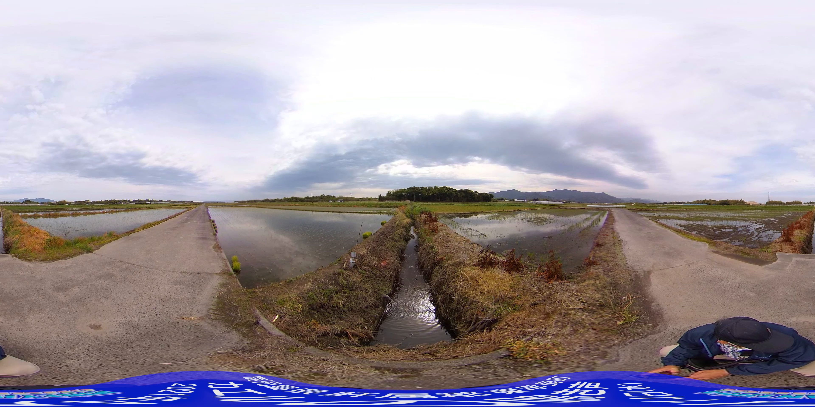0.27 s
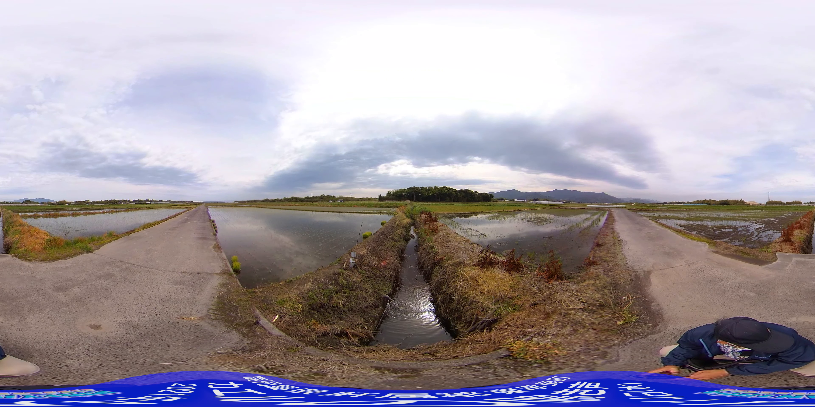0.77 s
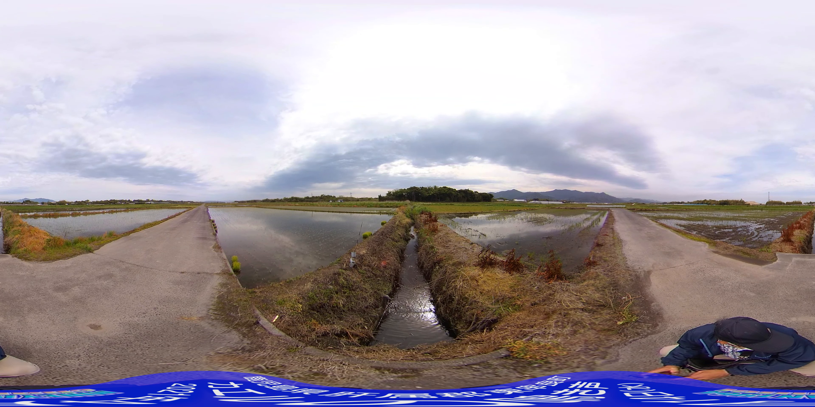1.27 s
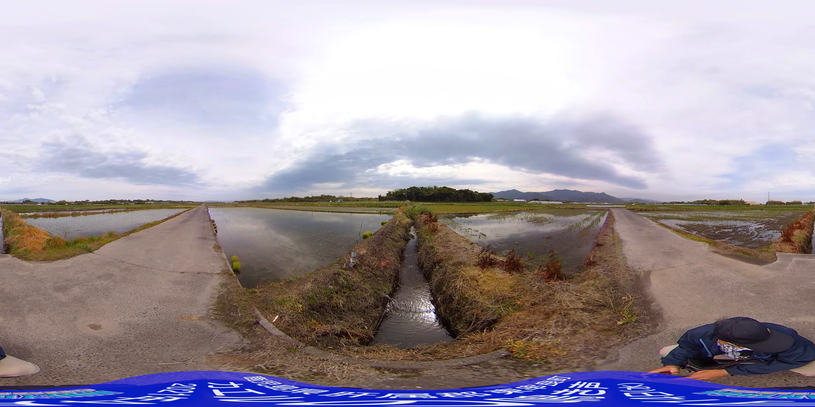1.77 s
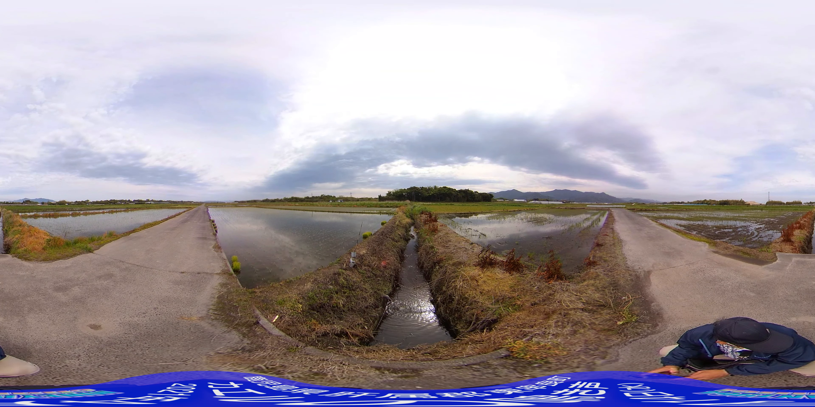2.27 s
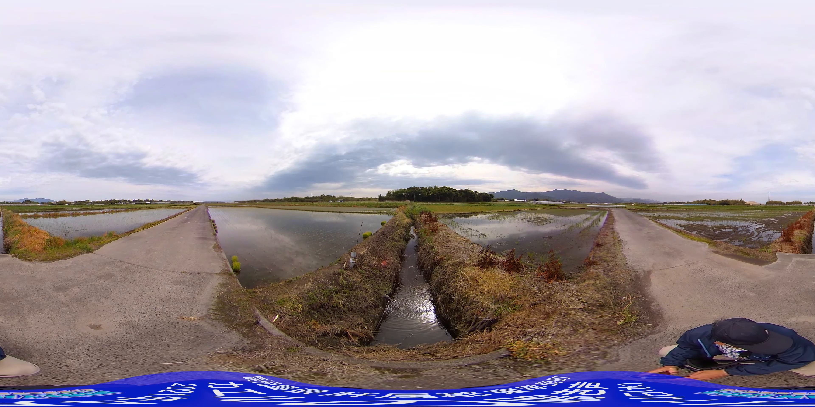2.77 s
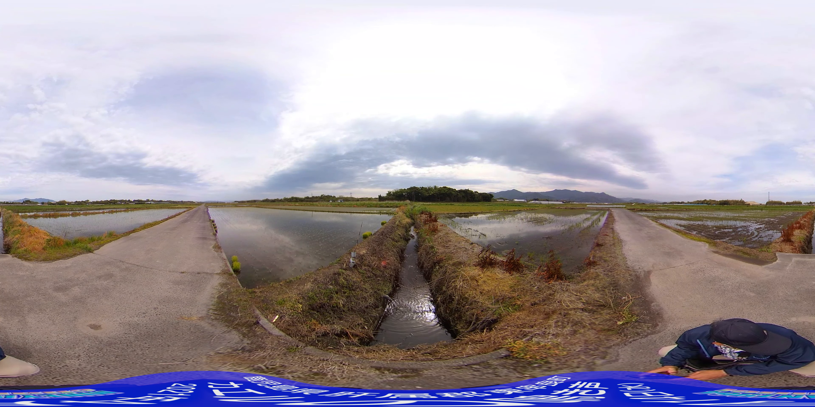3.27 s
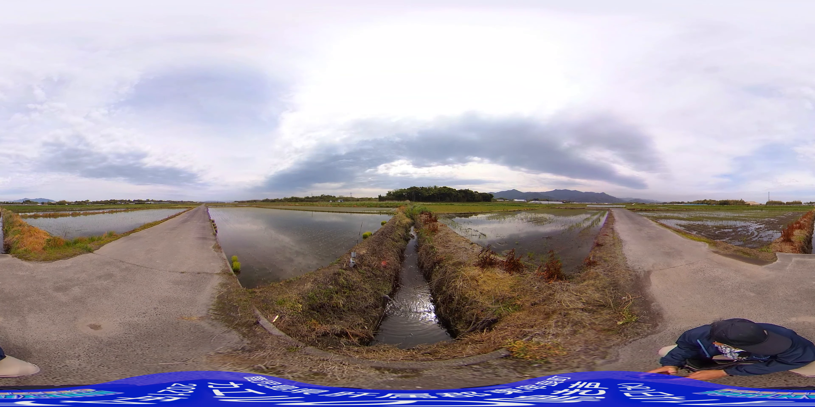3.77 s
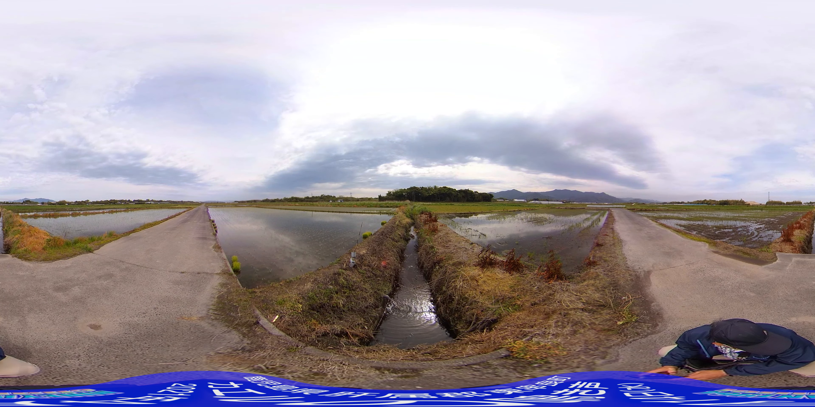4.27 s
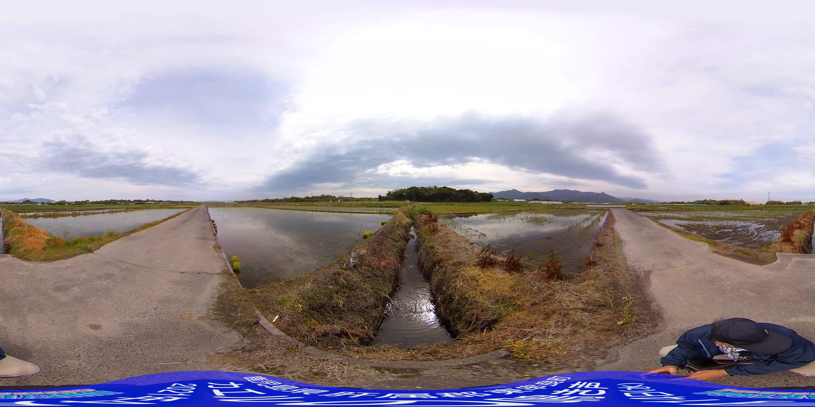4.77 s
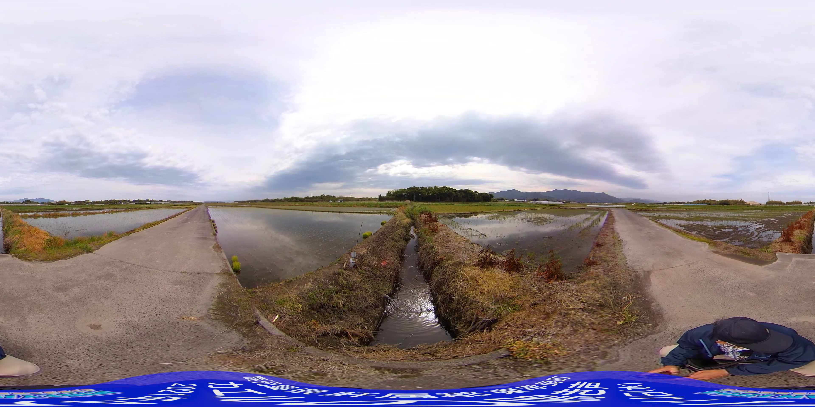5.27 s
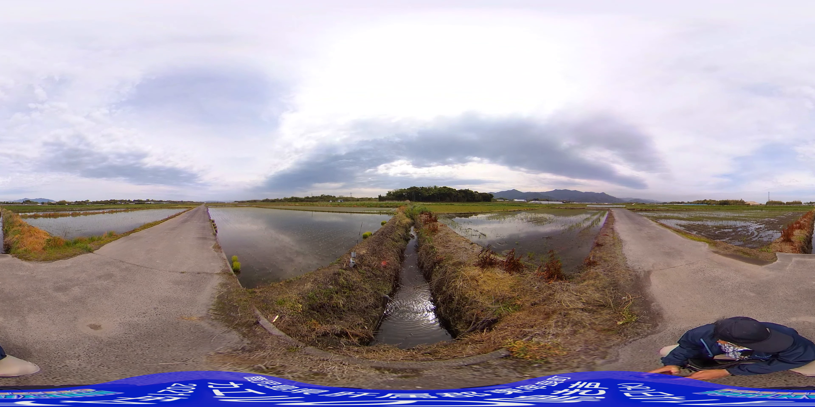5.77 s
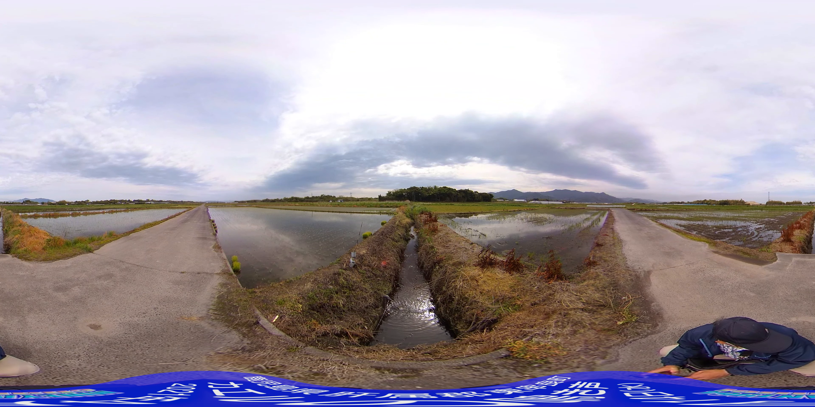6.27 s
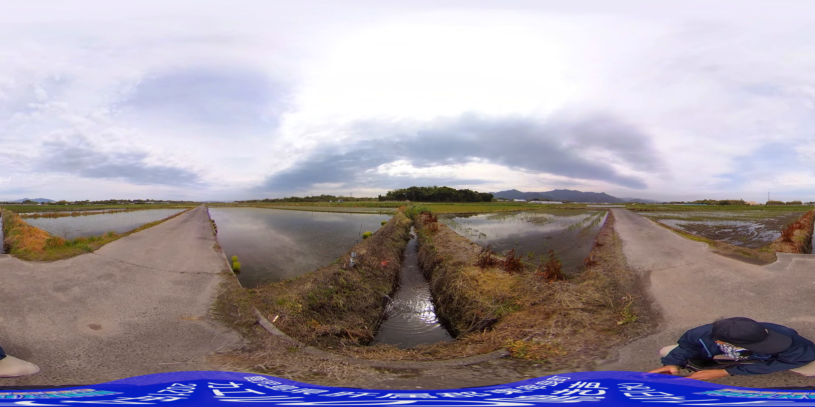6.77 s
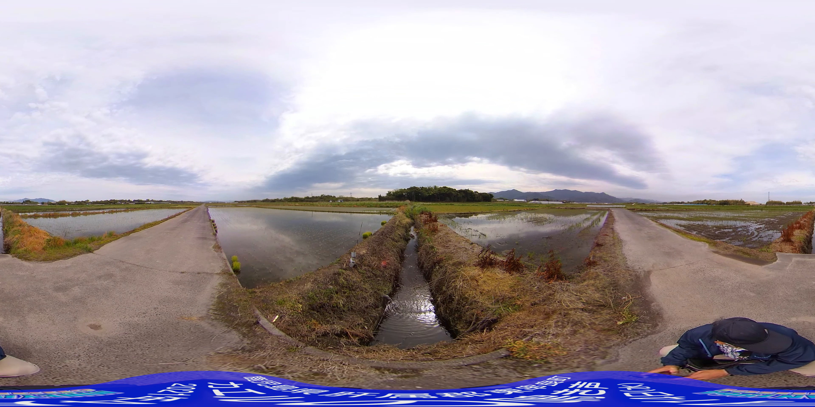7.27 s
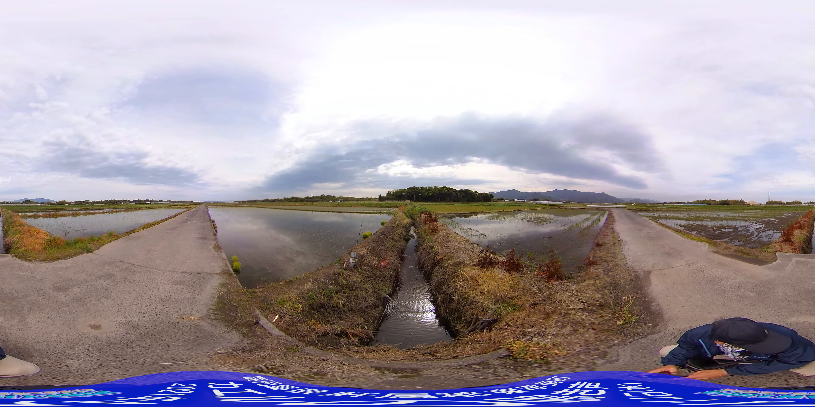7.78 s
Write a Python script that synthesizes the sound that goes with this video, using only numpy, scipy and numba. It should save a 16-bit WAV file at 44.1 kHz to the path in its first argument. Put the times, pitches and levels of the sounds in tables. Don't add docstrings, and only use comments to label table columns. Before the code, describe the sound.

Silence opens into a lively trickling rush over about two seconds. Bubbles plop and ring at mixed pitches, larger ones glugging low, while droplets tick and hiss over a constant watery bed. Frogs in the flooded fields click in brief trains on the right; a deeper one hoots quietly late on. Slight wind buffets the closely spaced stereo microphones outdoors, with no reverberant space.

```python
import sys
import numpy as np
from scipy import signal
from scipy.fft import rfft, irfft, next_fast_len
from scipy.io import wavfile
from scipy.ndimage import uniform_filter1d, map_coordinates
from numba import njit

SR = 44100
rng = np.random.default_rng(int(sys.argv[2]) if len(sys.argv) > 2 else 0)


def waveform_to_disk(signal):
    frames = np.transpose(np.atleast_2d(signal))
    scaled = np.clip(frames, -1, 1) * 32767
    samples = np.round(scaled).astype(np.int16)
    wavfile.write(sys.argv[1], SR, samples)


def undo_db(level):
    steps = np.asarray(level, float) / 20
    return 10 ** steps


N = 353990

# (frequency [Hz], density [dB per Hz])
SPRAY_COLOUR = [(1900, -10), (3300, -7.5), (3570, -26), (3840, -4), (4120, -5), (5000, -3.5), (5800, -4),
                (6500, -9), (7300, -13.5), (8500, -7.5), (9900, -4), (11500, -14.5), (13300, -13),
                (16000, -28.5)]


def unit(x):
    return x / np.sqrt(np.mean(x ** 2) + 1e-20)


def along(points, hz):
    f, v = np.transpose(points)
    return np.interp(np.log(hz + 1), np.log(f + 1), v)


def curves(rows):
    s, *cols = np.transpose(rows)
    return [np.interp(np.arange(N) / SR, s, c) for c in cols]


def wobble(rate):
    knots = rng.standard_normal(int(N * 60 / SR) + 4)
    return map_coordinates(knots, [np.arange(N) * rate / SR])


def ripple(rate):
    curve = wobble(rate)
    return unit(curve - uniform_filter1d(curve, size=SR // 6))


def filtered(x, response):
    m = next_fast_len(N + SR // 2)
    return irfft(rfft(x, m) * response(np.fft.rfftfreq(m, 1 / SR)), m)[..., :N]


def patchy(patchy_db):
    z = signal.stft(rng.standard_normal((2, N)), nperseg=256)[2]
    field = uniform_filter1d(rng.standard_normal(z.shape[1:]), size=5, axis=0)
    field = uniform_filter1d(field, size=6, axis=1)
    return signal.istft(z * undo_db(patchy_db * unit(field)), nperseg=256)[1][:, :N]


@njit
def add(out, peak, hz, gain, swell, fall, rise):
    for k in range(len(peak)):
        start = peak[k] - swell[k]
        for i in range(max(int(start) + 1, 0), min(int(peak[k] + 6 * fall[k]), len(out))):
            age = i - start
            if i < peak[k]:
                shape = np.sin(np.pi / 2 * age / swell[k]) ** 2
            else:
                shape = np.exp((peak[k] - i) / fall[k])
            cycles = hz[k] * age * (1 - rise + rise * age / fall[k])
            out[i] += gain[k] * shape * np.sin(2 * np.pi * cycles)


def grains(s, hz, gain, swell_s, fall_s, rise, pan_db, lag_s):
    out = np.zeros((2, N))
    for port, sign in enumerate((.5, -.5)):
        peak = (s + sign * lag_s) * SR
        add(out[port], peak, hz / SR, gain * undo_db(sign * pan_db), swell_s * SR, fall_s * SR, rise)
    return out


def swarm(lo_hz, hi_hz, cycles, spread_db, crowd_db, rise, count):
    dice, spot = rng.random((count, 4)), rng.standard_normal((count, 2))
    crowd = np.cumsum(undo_db(crowd_db))
    s = np.interp(dice[:, 0], crowd / crowd[-1], np.arange(N) / SR)
    hz = lo_hz * (hi_hz / lo_hz) ** dice[:, 1]
    gain = hz * undo_db(-spread_db * np.log(dice[:, 2]).clip(-3))
    fall_s = cycles * (.5 + dice[:, 3]) / hz
    return unit(grains(s, hz, gain, .7 / hz, fall_s, rise, .8 * spot[:, 0], 8e-6 * spot[:, 1]))


def rush(patchy_db, apart_hz):
    def turn(hz):
        return np.arccos(.955 * np.exp(-(hz / apart_hz) ** 3)) / 2

    mid, side = filtered(patchy(patchy_db), lambda hz: np.array([np.cos(turn(hz)), np.sin(turn(hz))]))
    return unit(np.array([mid + side, mid - side]))


def banks(f):
    # (centre [Hz], width [Hz], level [dB])
    modes = [(700, 100, 0.5), (1460, 60, 3), (1920, 1200, -8), (3750, 150, 0)]
    return 1 + sum(undo_db(db) * 1j * f * w / (c * c - f * f + 1j * f * w) for c, w, db in modes)


def strays(kind, count):
    hz, spread, db, scatter_db = kind
    clump_s = .025
    dice = rng.standard_normal((count, 3))
    s = np.repeat(rng.random(count), 3)[:count] * N / SR + clump_s * dice[:, 2]
    return np.c_[s.clip(0, (N - 1) / SR), hz * np.exp(spread * dice[:, 0]), db + scatter_db * dice[:, 1]]


def current():
    # (time [s], level [dB])
    flow = [(2, 1.5), (2.5, .5), (3.5, 1), (4, -0.7), (4.3, 0.5), (5.5, 0), (6.7, 1.3), (6.95, 1),
            (7.15, 2), (7.35, -.5), (8, 1)]
    # (frequency [Hz], density [dB per Hz])
    body = [(24, -54), (40, -24), (97, -8.5), (261, 1), (533, -2.5), (688, -3.5), (926, -3), (1460, -6),
            (1580, -9), (1960, -0.5), (2440, -7), (2970, -7.5), (4500, -21.5), (6500, -24.5), (9900, -120)]
    gurgle_db, fizz_db, far_db = -33, -43.5, -48.5
    fizz_growth = 0.39
    strength_db, = curves(flow)
    surge, flutter = ripple(18), ripple(50)
    crowd_db = 2.5 * surge + 2.5 * flutter

    gurgle = swarm(93.4, 4820, cycles=2.62, spread_db=2.5, crowd_db=crowd_db, rise=0.044, count=9000)
    singing = swarm(500, 3600, cycles=5, spread_db=3.5, crowd_db=crowd_db, rise=.03, count=900)
    gurgle += undo_db(-2.5) * singing
    gurgle += undo_db(6.5 + 0.13 * surge) * rush(patchy_db=2.0, apart_hz=10400)
    gurgle = unit(filtered(gurgle, lambda hz: undo_db(along(body, hz)) * banks(hz)))

    fizz = swarm(2800, 16000, cycles=2.2, spread_db=5, crowd_db=4 * surge + 4 * flutter,
                 rise=.03, count=20000)
    crackle = swarm(5000, 15000, cycles=.4, spread_db=4.5, crowd_db=2 * crowd_db, rise=0., count=1500)
    fizz += undo_db(-5.5) * crackle
    fizz += undo_db(0.11 * surge + 1.6 * flutter) * rush(patchy_db=6.5, apart_hz=12900)
    fizz = unit(filtered(fizz, lambda hz: undo_db(along(SPRAY_COLOUR, hz))))

    far = filtered(rush(patchy_db=1.0, apart_hz=13000), lambda hz: np.clip(hz / 5000, 0, 1) ** 2)
    near = undo_db(gurgle_db + strength_db) * gurgle + undo_db(fizz_db + fizz_growth * strength_db) * fizz
    return near + undo_db(far_db) * far


def breeze():
    # (time [s], level [dB])
    strength = [
        (2, -47.5),
        (4.4, -45.5),
        (6.4, -46),
        (6.8, -41),
        (7.4, -43.5),
        (8, -42.5),
    ]
    # (frequency [Hz], density [dB per Hz])
    buffet = [(15, -50), (25, -42), (40, -46), (60, -8.5), (190, -7.5), (520, -13.5), (900, -16),
              (1400, -20.5), (2500, -39)]
    level_db, = curves(strength)
    push, pull = filtered(patchy(0.5), lambda hz: undo_db(along(buffet, hz)))
    return undo_db(level_db + 1.6 * wobble(9)) * unit(np.array([.4 * push + pull, .4 * push - pull]))


def spits():
    # (time [s], frequency [Hz], peak level [dB])
    large_drops = [(0.905, 6300, -26.5), (0.99, 5030, -30), (1.158, 3680, -32.5), (1.583, 5550, -31),
                   (2.108, 3790, -28), (2.514, 4680, -31.5), (3.093, 4730, -29), (3.466, 4730, -31),
                   (3.56, 4300, -27), (3.785, 4340, -31), (4.005, 6050, -33), (4.318, 6490, -33),
                   (4.418, 3960, -31.5), (4.783, 4830, -31.5), (5.451, 5230, -30.5), (5.583, 4280, -28),
                   (5.94, 5600, -29), (6.124, 5300, -27), (6.342, 5560, -31), (6.539, 6100, -28),
                   (7.158, 5700, -31), (1.27, 5920, -35), (1.522, 5370, -32), (3.872, 5200, -35),
                   (5.603, 5610, -35), (6.574, 3900, -30), (6.806, 4500, -33), (7.02, 5500, -34),
                   (8.01, 3860, -28.5)]
    # (time [s], peak level [dB])
    tiny_drops = [(1.326, -34), (1.691, -34), (1.911, -37), (2.335, -40), (2.346, -36), (2.699, -28),
                  (3.372, -38), (3.409, -32), (3.744, -32), (3.911, -30), (4.247, -33.5), (4.67, -36),
                  (4.704, -34), (4.955, -36.5), (5.066, -39), (5.092, -35), (6.166, -33.5), (6.676, -36),
                  (7.044, -38), (7.603, -32.5), (7.742, -34.5)]
    # (frequency [Hz], pitch scatter [ratio], level [dB], scatter [dB])
    small_spits = (5000, .2, -38, 2)
    small_ticks = (9800, .06, -38, 2)
    tick_hz, tick_scatter = 9600, .04
    ticks = [(s, tick_hz * (1 + tick_scatter * rng.normal()), db + 4.0) for s, db in tiny_drops]
    s, hz, db = np.r_[large_drops, ticks, strays(small_spits, count=36), strays(small_ticks, count=24)].T
    still = np.zeros(len(s))
    tick = grains(s, hz, undo_db(db + 12), 0.62 / hz, 1.7 / hz, 0.0084, still, still)
    bursts = np.bincount((s * SR).astype(int), undo_db(db - 2.0), N)
    puff = signal.lfilter([1], [1, -np.exp(-1 / (.004 * SR))], bursts)
    spray = filtered(rush(patchy_db=3, apart_hz=14000), lambda hz: undo_db(along(SPRAY_COLOUR, hz)))
    return tick + puff * unit(spray)


def froth(rows, count):
    spread_s, pitch_scatter, level_db = .007, .2, -9
    s, hz, db = np.repeat(rows, count, axis=0).T
    dice = rng.standard_normal((len(s), 3))
    s = s + spread_s * np.abs(dice[:, 0])
    return np.c_[s, hz * np.exp(pitch_scatter * dice[:, 1]), db + level_db + 2 * dice[:, 2]]


def bubbles():
    # (time of peak [s], frequency [Hz], peak level [dB])
    small_clear = [(1.202, 2070, -20), (1.28, 2420, -17.5), (1.585, 2180, -16), (1.926, 2060, -18),
                   (2.015, 2180, -12.5), (2.084, 2240, -12.5), (2.158, 1793, -19), (2.243, 1690, -17.5),
                   (2.348, 2940, -19.5), (2.967, 2180, -12.5), (3.113, 2920, -17.5), (3.213, 2140, -16.5),
                   (3.272, 1880, -18), (3.546, 2050, -18), (4.007, 2510, -17.5), (4.125, 2200, -19),
                   (4.364, 2250, -22), (5.459, 1600, -23.5), (5.425, 3120, -18.5), (6.105, 2500, -15.5),
                   (6.123, 2610, -16), (6.443, 2760, -19.5), (6.693, 2850, -18), (6.739, 1420, -20),
                   (7.043, 2180, -16), (7.204, 2190, -16), (7.254, 1870, -19.5), (7.457, 1980, -14.5),
                   (7.512, 1870, -19), (7.934, 2770, -19)]
    # (time of onset [s], peak level [dB], frequency [Hz])
    large_clear = [(1.719, -18.5, 725), (2.235, -21.5, 1180), (2.429, -24, 735), (2.469, -21.5, 1060),
                   (2.636, -24, 680), (3.042, -21.5, 730), (3.069, -20, 1080), (3.212, -23, 1140),
                   (3.444, -18.5, 1110), (3.599, -24, 716), (4.082, -26, 750), (4.224, -24, 680),
                   (4.286, -23, 765), (4.362, -22, 670), (4.736, -22.5, 785), (5.104, -23.5, 730),
                   (5.271, -20.5, 716), (5.472, -23, 740), (5.53, -19, 740), (5.644, -24.5, 700),
                   (5.846, -20, 720), (5.879, -22, 696), (5.924, -25.5, 730), (6.128, -20, 666),
                   (6.473, -18, 720), (6.805, -20.5, 710), (5.744, -20.5, 880), (7.357, -23, 715),
                   (7.866, -25, 810), (7.903, -24, 820)]
    # (frequency [Hz], pitch scatter [ratio], level [dB], scatter [dB])
    small_faint = (2600, .22, -27, 2.5)
    low_faint = (1430, .04, -27, 3)
    large_faint = (715, .1, -32, 2)
    onset, glug_db, glug_hz = np.r_[large_clear, strays(large_faint, count=48)[:, [0, 2, 1]]].T
    s, hz, db = np.r_[small_clear, froth(small_clear, count=4),
                      strays(small_faint, count=90), strays(low_faint, count=12)].T
    s = np.r_[s, onset + 1.3 / glug_hz]
    hz = np.r_[hz, glug_hz]
    db = np.r_[db - .7, glug_db + .6]
    spot = rng.standard_normal((len(s), 3))
    fall_s = 3.4 / hz * (hz / 2200) ** .3 * undo_db(1.8 * spot[:, 2])
    return grains(s, hz, undo_db(db), 1.226 / hz, fall_s, 0.005, 2.3 * spot[:, 0], 8e-6 * spot[:, 1])


def clicks():
    # (first click [s], last click [s], frequency [Hz], peak level [dB])
    trains = [(1.5, 1.5, 2000, -23), (1.541, 1.626, 2060, -19), (1.814, 1.88, 1980, -30.5),
              (2.186, 2.186, 2190, -23), (2.293, 2.74, 1860, -17.5), (2.309, 2.509, 1760, -30),
              (2.351, 2.351, 1880, -21), (2.561, 2.562, 1890, -22), (2.804, 2.885, 2000, -25),
              (3.026, 3.024, 2020, -18.5), (3.315, 3.477, 2070, -24), (3.46, 3.461, 2030, -17.5),
              (3.409, 3.655, 1760, -27), (3.668, 3.746, 2000, -36), (4.256, 4.34, 2140, -34),
              (4.467, 4.606, 1860, -21), (4.682, 4.921, 1980, -29), (4.692, 4.773, 1980, -22.5),
              (4.817, 5.012, 1760, -21.5), (5.06, 5.222, 2040, -30), (5.273, 5.273, 2030, -22.5),
              (5.652, 5.652, 1990, -22), (5.939, 6.025, 2000, -18), (6.08, 6.08, 1750, -25.5),
              (6.372, 6.503, 1720, -24), (6.576, 6.712, 1870, -23), (6.63, 6.63, 1830, -24),
              (7.092, 7.226, 1940, -23), (7.579, 7.845, 1820, -20), (7.86, 7.896, 1690, -22)]
    low_hz, low_gap_s, gap_s_per_khz = 1750, .066, .052
    ends_db = -1
    rows = []
    for first, last, hz, db in trains:
        gap_s = low_gap_s + gap_s_per_khz * (hz - low_hz) / 1000
        gaps = round((last - first) / gap_s)
        place = np.linspace(0, 1, gaps + 1)
        swell_db = -ends_db * (2 * place - 1) ** 2 * (gaps > 1)
        rows += zip(first + place * (last - first), hz + 0 * place, db + swell_db)
    return np.transpose(rows)


def frogs():
    # (start [s], length [s], frequency [Hz], level [dB])
    hoots = [
        (5.83, .14, 272, -38),
        (6.13, .18, 272, -37.5),
        (6.62, .18, 272, -39),
        (2.54, .18, 1790, -38.5),
        (2.72, .035, 1820, -31),
    ]
    s, hz, db = clicks()
    hz = hz * (1 + 0.034 * rng.standard_normal(len(s)))
    db = db + 3 * rng.standard_normal(len(s))
    fall_s = 0.0023 * undo_db(rng.normal(0, 1.2, len(s)))
    pan_db, lag_s = np.full(len(s), -7.5), np.full(len(s), 2e-5)
    out = grains(s, hz, undo_db(db - 1.9), 0.657 * fall_s, fall_s, -0.0024, pan_db, lag_s)
    t = np.arange(N) / SR
    for start, span, call_hz, call_db in hoots:
        swell = np.sin(np.pi * np.clip((t - start) / span, 0, 1)) ** 0.45
        tone = np.sin(2 * np.pi * call_hz * t + .8 * wobble(30))
        side_db = -2.5 if call_hz > 1000 else .4
        out += undo_db(call_db + 0.35 * wobble(50)) * swell * tone * undo_db([[side_db], [-side_db]])
    return out


def scene():
    return current() + breeze() + spits() + bubbles() + frogs()


def roll_off(x):
    return signal.sosfilt(signal.butter(12, 16810, fs=SR, output="sos"), x)


def record(dry):
    # (frequency [Hz], left lead [rad])
    port_phase = [(4300, 0), (6500, -.2), (7400, -1.6), (8400, -1.9), (10300, -1.3), (11500, -.8),
                  (12900, -2.9), (16000, -2)]
    # (frequency [Hz], left minus right [dB])
    port_tilt = [(60, -1), (180, 1.5), (550, 1), (1650, 0), (4970, 1.5), (15000, 2)]
    # (start [s], length [s], curve power [1])
    fade_in = (0.6, 1.656, 2.06)
    half = np.array([[.5], [-.5]])

    def response(hz):
        level = undo_db(half * along(port_tilt, hz))
        phase = np.exp(1j * half * along(port_phase, hz))
        return level * phase * (hz < 15800) / (1 + (44 / (hz + 1)) ** 6)

    start, span, power = fade_in
    fade = np.clip((np.arange(N) / SR - start) / span, 0, 1) ** power
    return roll_off(filtered(dry, response) * fade)


dry = scene()
out = record(dry)
waveform_to_disk(out)
```